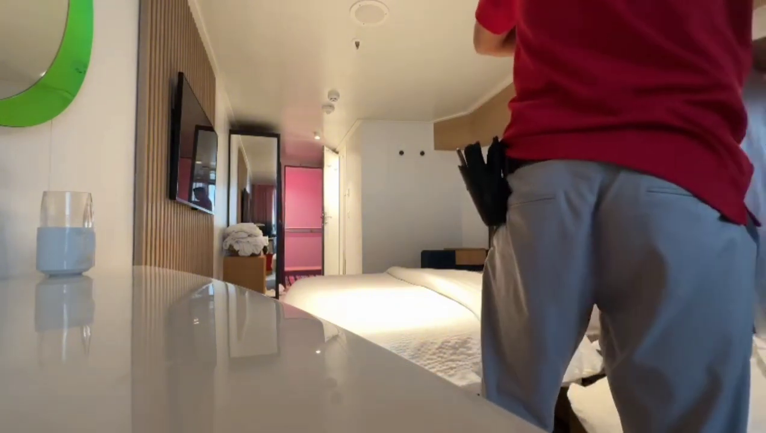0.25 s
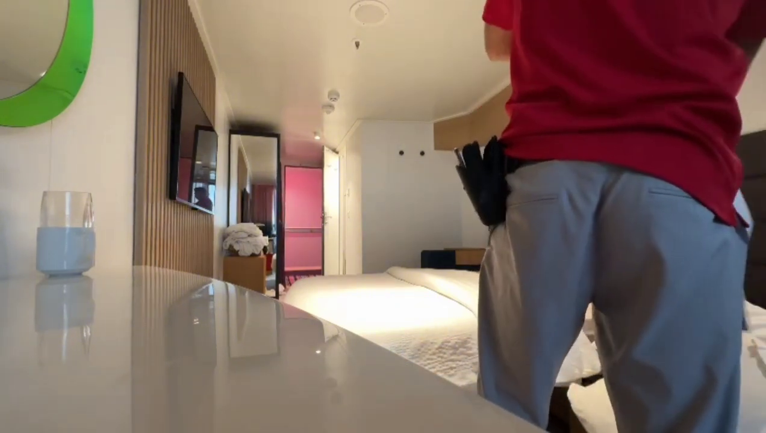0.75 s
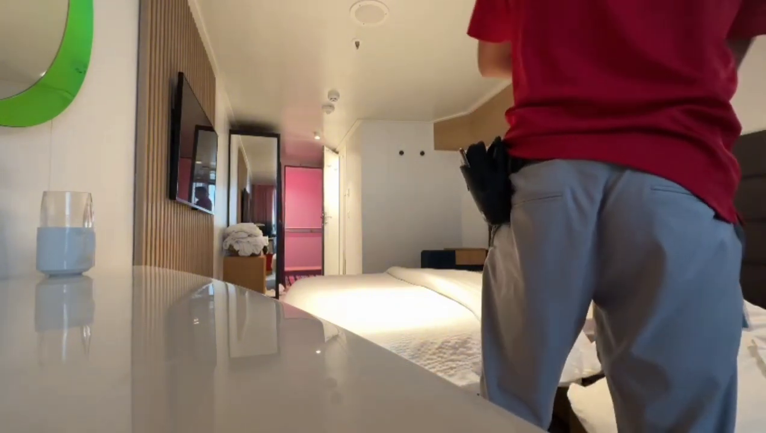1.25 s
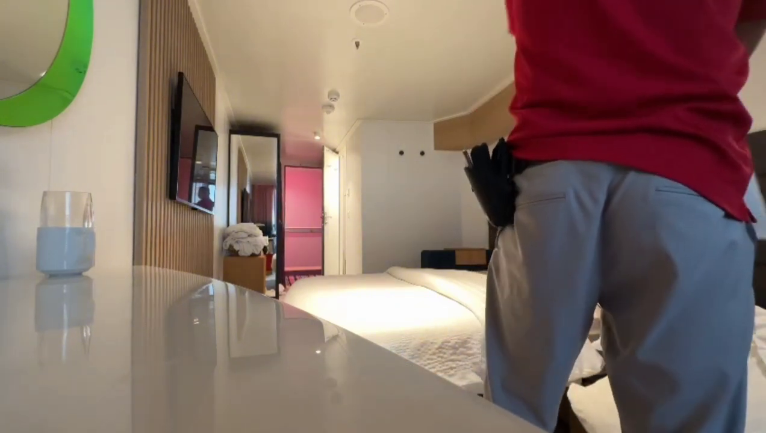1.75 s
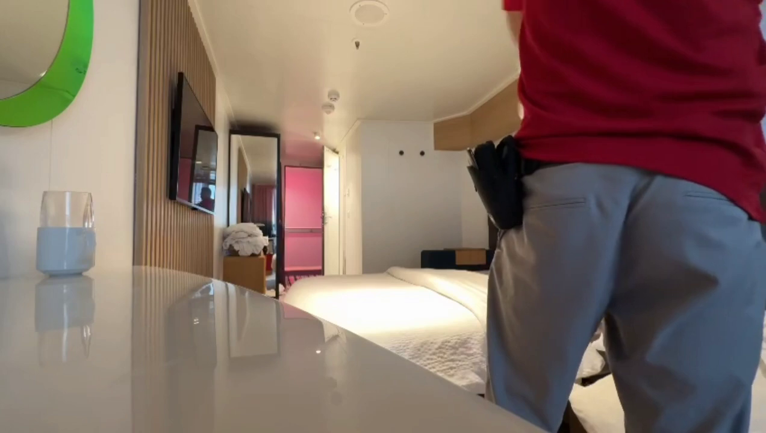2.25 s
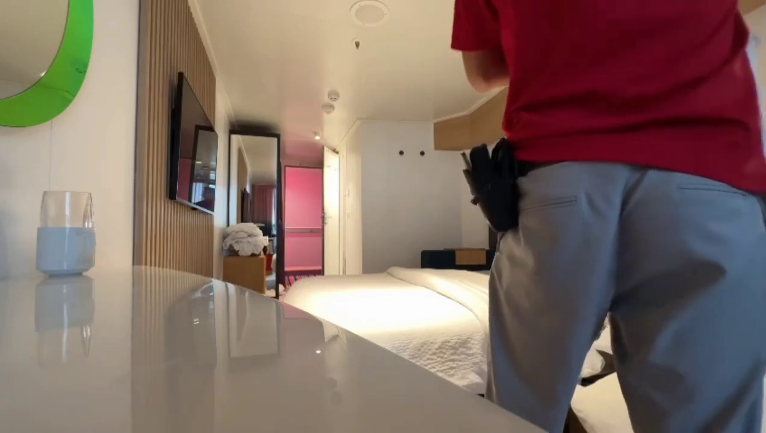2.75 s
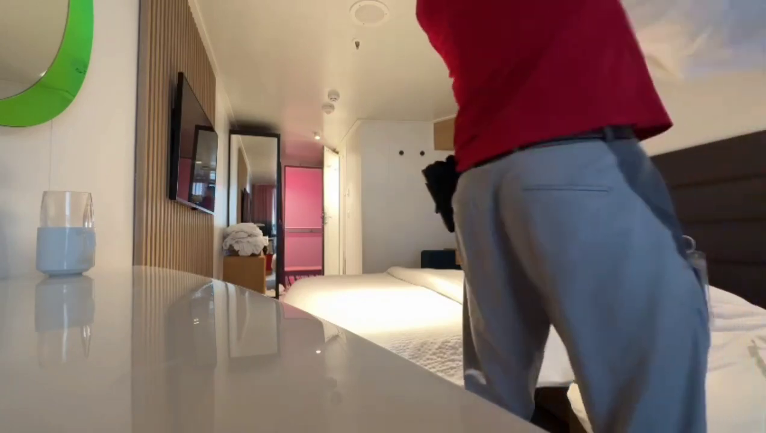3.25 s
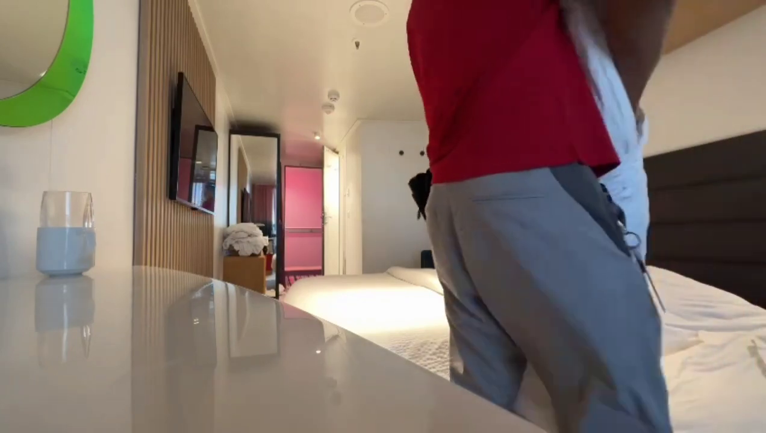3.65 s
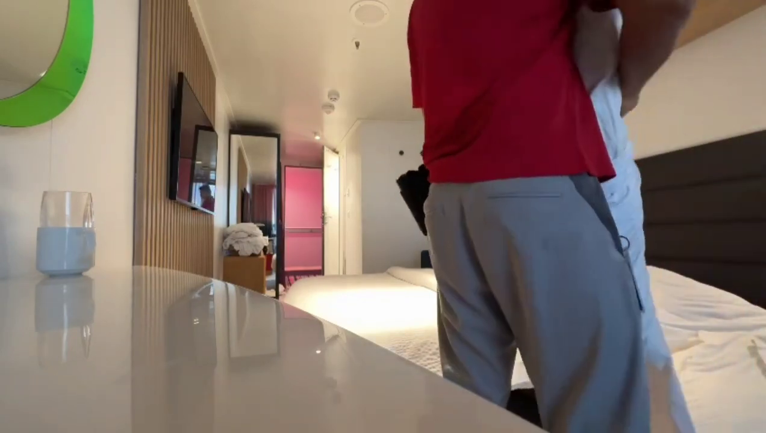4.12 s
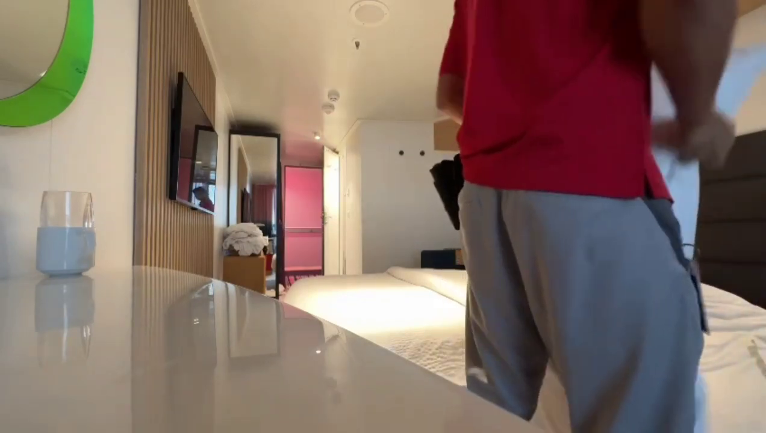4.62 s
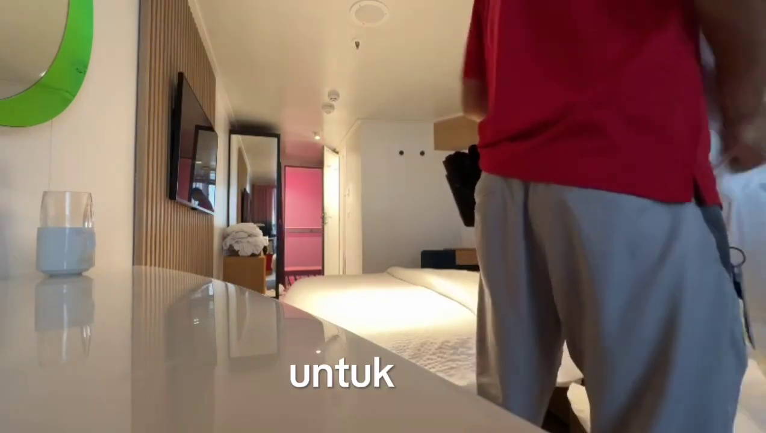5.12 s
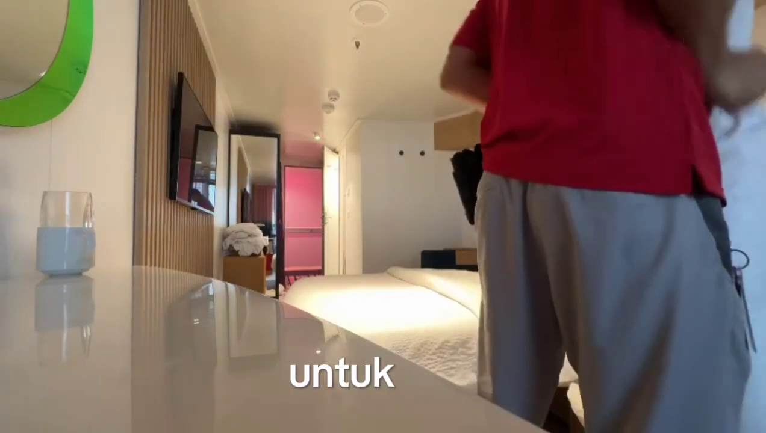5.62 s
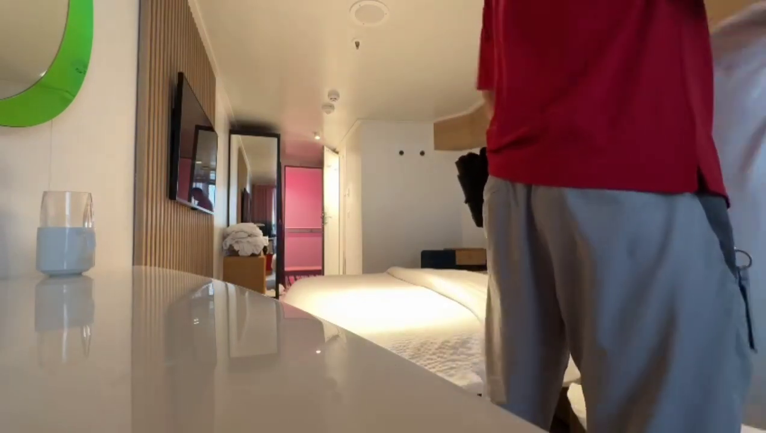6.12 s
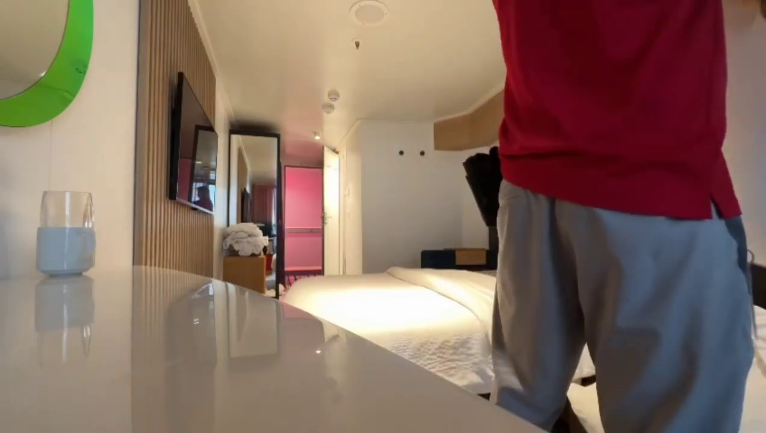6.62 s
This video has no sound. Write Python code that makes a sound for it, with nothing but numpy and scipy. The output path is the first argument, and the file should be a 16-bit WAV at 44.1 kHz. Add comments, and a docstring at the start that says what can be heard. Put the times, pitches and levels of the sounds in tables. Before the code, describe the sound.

Bed linen handled near a stereo microphone in a compact, softly furnished room with deep duct rumble. Cotton rubs and crumples in short strokes, with tiny crease ticks and muted flaps. The pillow swings with an airy low thump, quieter tugging follows, then four rapid downward shakes whip the cloth, the first loudest and ringing nearby fittings briefly. It settles into light rustle, leaning slightly left.

```python
"""Pillow into its cotton case

Close by a bed in a small cabin, a pillow is worked into its case over the rumble of the ventilation.
Dense chance slips make the hiss of cloth on cloth; sparser dull pops make crumpling folds, with single creases
ticking. Filtered bursts make snaps and flaps. The pillow is swung, then shaken down four times with puffs of air,
short swelling low tones; the hardest shake rings the fittings as decaying sines. Two microphone ports hear it."""
import sys
import numpy as np
from scipy import signal
from scipy.fft import rfft, irfft, next_fast_len
from scipy.io import wavfile
from scipy.ndimage import uniform_filter1d

SR = 44100
rng = np.random.default_rng(int(sys.argv[2]) if len(sys.argv) > 2 else 0)


def int16_out(signal):
    """Quantize to a 16-bit WAV file."""
    q = np.round(np.clip(np.atleast_2d(signal).T, -1, 1) * 32767)
    wavfile.write(sys.argv[1], SR, q.astype(np.int16))


N = 302967
SIZE = next_fast_len(N + SR // 2, True)   # room for the cabin tail
TIME = np.arange(N) / SR
HZ = np.fft.rfftfreq(SIZE, 1 / SR)

# Every level_db column is relative: gains, filters and the cabin still act on it.
# spectrum of the ventilation: hz, level_db
VENT_SPECTRUM = [(12, -43), (20, -4.5), (89, 2.5), (159, -5), (243, -16.5), (383, -18.5), (1450, -28),
                 (2150, -38.5), (5040, -45.5), (9800, -50), (11500, -43), (15000, -99), (22000, -120)]
# how alike the ventilation is at the two ports: hz, likeness (0-1)
VENT_LIKENESS = [(30, .93), (70, .8), (130, .55), (250, .2), (600, 0), (9000, .1)]
# left-right level of the ventilation: hz, left_right_db
VENT_BALANCE = [(100, 2), (150, 6.5), (240, 2.5)]
# share of the cloth sound reaching the ports directly: hz, direct_share (0-1)
DIRECT_SHARE = [(130, .6), (220, .1), (300, .45), (520, .55), (1100, .28), (2000, .25), (2700, .07),
                (11000, .13)]
# phase by which the left port leads: hz, lead_rad
LEFT_LEAD = [(160, 0), (220, -1), (380, 0), (460, -2.4), (800, -2.6), (1300, -1.8), (1800, -3), (2400, 0)]
# left-right level of the cloth along the path from the bed: hz, left_right_db
PATH_BALANCE = [(60, -1), (150, 1.5), (330, -2.5), (500, -1), (900, -1.5), (1550, 2.2), (2400, -3),
                (5000, 3), (6800, 5), (9000, -7), (11000, -3)]
# where the hands work: time_s, left_right_db
HAND_PLACE = [(2.5, 4), (3.6, 2.5), (6.0, 2.5), (6.87, 4)]
# ringing modes of the cabin's fittings: pitch_hz, level_db
FITTING_MODES = [(296, -22), (640, -34), (845, -15.5), (1331, -25), (1768, -48), (2145, -32), (2393, -26),
                 (2540, -45), (3207, -45)]
# the pillow pushes air or lands softly: middle_s, level_db, pitch_hz
PUFFS = [(1.206, -35.5, 95), (3.597, -33, 110), (3.622, -30.5, 59), (5.3, -30, 63.6), (5.544, -27, 110),
         (5.799, -33.5, 72), (6.025, -26.5, 101.5), (6.245, -33.5, 90)]
# a fold snaps taut: start_s, level_db, pitch_hz
SNAPS = [(0.074, -42, 800), (0.327, -40, 800), (0.646, -42.5, 700), (0.703, -39, 500), (0.791, -37.5, 400),
         (0.849, -41, 380), (1.026, -34, 600), (1.109, -39, 950), (1.441, -36, 290), (1.932, -43.5, 500),
         (2.147, -32, 470), (2.825, -38, 330), (3.222, -31, 700), (3.251, -37, 350), (3.597, -30, 400),
         (3.872, -35.5, 850), (4.576, -39, 600), (4.613, -37.5, 330), (4.866, -28.5, 900),
         (5.183, -30.5, 340), (5.459, -33, 650), (5.477, -26, 370), (5.52, -26, 2400), (5.531, -15, 700),
         (5.545, -22, 270), (5.789, -25.5, 290), (5.981, -28, 420), (6.007, -22, 330), (6.049, -31, 450),
         (6.244, -33, 300)]
# the case flaps as it is tugged or shaken: crest_s, level_db, length_s, billow_hz
FLAPS = [(1.014, -36.5, 0.034, 750), (1.434, -33, 0.018, 450), (2.157, -32.5, 0.021, 424),
         (2.719, -41, 0.029, 560), (3.543, -36.5, 0.03, 350), (3.595, -33.5, 0.058, 480),
         (3.677, -37, 0.029, 500), (4.963, -35.5, 0.021, 448), (5.292, -32, 0.039, 407),
         (5.497, -28.5, 0.023, 414), (5.529, -31, 0.015, 2450), (5.53, -21.5, 0.021, 680),
         (5.557, -25, 0.024, 340), (5.758, -30, 0.0224, 400), (5.79, -29.5, 0.02, 394),
         (5.992, -26.5, 0.011, 566), (6.019, -24, 0.017, 290), (6.242, -35.5, 0.059, 358)]
# spectrum of the slips in a flap: hz, level_db
FLAP_SPECTRUM = [(70, -8), (160, 8.5), (230, -2), (330, 2.5), (520, -6.5), (850, 1), (1500, -2.5),
                 (1950, -4), (2400, 0.5), (3200, -23.5), (5000, -4), (11000, -64)]
# spectrum of the crumpling pops: hz, level_db
CRUMPLE_SPECTRUM = [(70, 1), (170, -6), (350, -0.5), (600, -6.5), (1100, -6.5), (1600, -12.5), (2100, -19),
                    (4000, -23.5), (9000, -33)]
# spectrum of the sliding hiss: hz, level_db
SLIDE_SPECTRUM = [(300, -17), (900, -1), (1500, 3), (2200, -4), (3000, -6), (4500, -4.5), (7000, -6),
                  (9000, -3), (10000, -5.5), (11500, -7)]
# a hand draws cloth over cloth: fastest_s, hiss_level_db, crumple_level_db, length_s
STROKES = [(0.127, -68.5, -55.5, 0.14), (0.316, -51.5, -51.5, 0.089), (0.54, -52, -49, 0.084),
           (0.751, -45.5, -46.5, 0.078), (0.84, -64.5, -51.5, 0.2), (1.014, -45, -46, 0.092),
           (1.127, -67, -42.5, 0.089), (1.182, -51, -50, 0.11), (1.417, -48.5, -42, 0.13),
           (1.579, -58.5, -53.5, 0.13), (1.983, -57.5, -47, 0.072), (2.17, -48, -39.5, 0.03),
           (2.221, -41.5, -38.5, 0.083), (2.38, -57.5, -50.5, 0.49), (2.676, -45.5, -40, 0.075),
           (2.84, -55, -46.5, 0.079), (3.202, -55.5, -47, 0.22), (3.467, -52.5, -45.5, 0.16),
           (3.585, -51, -40.5, 0.14), (3.797, -50, -54, 0.11), (4.23, -57.5, -52.5, 0.31),
           (4.402, -52, -49.5, 0.087), (4.596, -55, -46.5, 0.11), (4.942, -53, -45, 0.26),
           (5.218, -46, -38.5, 0.084), (5.34, -58, -46, 0.35), (5.915, -53.5, -50.5, 0.059),
           (6.612, -56.5, -46, 0.099), (6.76, -53, -49.5, 0.14)]
# the pillow is shaken down: fastest_s, hiss_level_db, crumple_level_db
SHAKES = [(5.522, -44, -29.5), (5.773, -45, -34), (6.014, -42, -37), (6.243, -44.5, -41.5)]

VENT_DB = -47
BOOM_HZ, BOOM_Q, BOOM_DB = 298.5, 11, -4   # the cabin's own low resonance
CRACK_S, SLAP_S = 5.521, 5.531   # in the hardest shake the hem cracks first, then the body slaps
CRACK_ABOVE_HZ = 2000
FITTING_T60_S = 0.074
SNAP_DB, SNAP_SETTLE_S = -17.5, 0.008
FLAP_RISE_SHARE = 0.34   # part of a flap spent whipping taut
DULL_OCTAVES = 1.0   # a flap is dull from this far above its billow
STROKE_RISE_SHARE = 0.51   # part of a stroke spent speeding up
SHAKE_S, SHAKE_RISE_SHARE = 0.05, 0.6   # every shake is the same short jerk
# after a shake the cloth settles, starting with the shake and trailing after it
SETTLE_DB, SETTLE_AFTER_S, SETTLE_S, SETTLE_RISE_SHARE = -10.5, 0.021, 0.11, 0.31
EDGE = 5.5   # how steeply a movement starts and stops
HELD_POWER, HELD_HISS_DB, HELD_CRUMPLE_DB = 0.81, -66, -59.5   # faint stir of held cloth; power scales both
CUTOFF_HZ = 11700


def from_db(db):
    """Decibels to gain."""
    return 10 ** (np.asarray(db) / 20)


def rms_one(x):
    """Scale to an rms of 1."""
    return x / np.sqrt(np.mean(x ** 2) + 1e-20)


def over_hz(points):
    """Interpolate a table of (Hz, value) over log frequency."""
    hz, value = np.transpose(points)
    return np.interp(np.log(HZ + 1), np.log(hz), value)


def filtered(x, response):
    """Pass a signal through a frequency response."""
    return irfft(rfft(x, SIZE) * response, SIZE)[..., :N]


def colour(x, spectrum):
    """Give a signal a spectrum; rms 1."""
    return rms_one(filtered(x, from_db(over_hz(spectrum))))


def panned(left_right_db):
    """Left and right gains for a level difference."""
    return from_db(np.vstack([left_right_db, -left_right_db]) / 2)


def peak_filtered(x, hz, q):
    """Keep the ring of one resonance."""
    b, a = signal.iirpeak(hz, q, fs=SR)
    return signal.lfilter(b, a, x)


def drift(rate_hz):
    """Slow chance with a spread of 1."""
    return rms_one(filtered(rng.standard_normal(N), 1 / (1 + (HZ / rate_hz) ** 2)))


def fluttering(x, split_hz, depth_db, rate_hz):
    """The dull and the bright part of a sound waver in level, each on its own."""
    dull = filtered(x, 1 / (1 + (HZ / split_hz) ** 4))
    bright = x - dull
    return dull * from_db(depth_db * drift(rate_hz)) + bright * from_db(depth_db * drift(rate_hz))


def ventilation():
    """Air in the ducts, wavering a little; its deep rumble reaches both ports alike."""
    likeness = over_hz(VENT_LIKENESS)
    mid, side = colour(rng.standard_normal((2, N)), VENT_SPECTRUM)
    # the weaker the side signal, the more alike the ports
    side = filtered(side, np.sqrt((1 - likeness) / (1 + likeness)))
    ports = np.array([mid + side, mid - side])
    air = fluttering(ports, split_hz=200, depth_db=1.3, rate_hz=5)
    return from_db(VENT_DB) * filtered(air, panned(over_hz(VENT_BALANCE)))


def evened(response, bins=700):
    """The broad level of a response, without its fine ripple."""
    return np.sqrt(uniform_filter1d(np.abs(response) ** 2, bins) + 1e-12)


def cabin(patches, tail_t60_s=0.12):
    """One patch faces both ports; two come off the close walls, with a short tail that the bed soaks up."""
    tail = rng.standard_normal((2, N)) * from_db(-60 * np.minimum(TIME / tail_t60_s, 2))
    walls = 1 + rfft(tail / np.linalg.norm(tail[0]), SIZE)
    share = over_hz(DIRECT_SHARE)
    port_phase = 0.5j * over_hz(LEFT_LEAD) * [[1], [-1]]
    direct = np.sqrt(share) * np.exp(port_phase)
    echoes = np.sqrt(1 - share) * walls / evened(walls)
    # divide by what the two ports hear together, so that phase leaves the tone alone
    centre = np.sqrt(abs(direct.mean(axis=0)) ** 2 + (1 - share) / 2)
    tone = panned(over_hz(PATH_BALANCE)) / centre
    return filtered(patches[0], direct * tone) + filtered(patches[1:], echoes * tone)


def boom(linen):
    """The cabin's own low resonance, rung by the linen."""
    return from_db(BOOM_DB) * peak_filtered(linen, BOOM_HZ, BOOM_Q)


def fittings_ringing():
    """The crack rings the high modes and the slap the low ones, a quarter cycle apart at the ports."""
    out = 0
    port_phase = np.array([[0], [np.pi / 2]])
    for hz, db in FITTING_MODES:
        struck_s = CRACK_S if hz > CRACK_ABOVE_HZ else SLAP_S
        age = np.clip(TIME - struck_s, 0, 1)
        swell = 1 - np.exp(-age / 0.001)
        decay = from_db(db - 60 * age / FITTING_T60_S)
        out = out + decay * swell * np.sin(2 * np.pi * hz * age + port_phase)
    return out


def puffing():
    """A push of air that swells, swings back and dies within two cycles of its middle."""
    out = np.zeros(N)
    for s, db, hz in PUFFS:
        turns = np.clip((TIME - s) * hz, -10, 10)
        out += from_db(db) * np.sin(2 * np.pi * turns) * np.exp(-turns ** 2)
    return out


def grains(per_s, spread_db, count=3):
    """Tiny slips at random moments, of uneven size, on each patch of cloth."""
    born = rng.random((count, N)) < per_s / SR
    sign = rng.choice([-1, 1], (count, N))
    chance = rng.standard_normal((count, N))
    return born * sign * from_db(spread_db * np.clip(chance, -2, 2))


def snapping(width_octaves=1.62, crack=2.0):
    """A fold gives way with a soft crack and a dying run of slips; thick folds sound lower."""
    out = np.zeros((3, N))
    slips = grains(per_s=2500, spread_db=2.0)
    settling = np.exp(-TIME[:SR // 10] / SNAP_SETTLE_S)
    for s, db, hz in SNAPS:
        start = round(s * SR)
        span = slice(start, start + len(settling))
        run = slips[:, span] * settling
        run[:, 0] = crack
        edges_hz = hz * 2 ** (width_octaves * np.array([-.5, .5]))
        fold = signal.butter(2, edges_hz, "band", fs=SR, output="sos")
        run = signal.sosfilt(fold, signal.sosfilt(fold, run))
        out[:, span] += from_db(db + SNAP_DB) * rms_one(run)
    return out


def flapping(per_s=3000, spread_db=-0.5, gain_db=0.5, billow_db=1.5, billow_q=3.2):
    """Slack cloth whips taut: pops swell to a crest and die, and the billow rings at its own pitch."""
    out = 0
    pops = colour(grains(per_s, spread_db), FLAP_SPECTRUM)
    for s, db, length_s, billow_hz in FLAPS:
        rise_s, fall_s = FLAP_RISE_SHARE * length_s, (1 - FLAP_RISE_SHARE) * length_s
        away = np.maximum((s - TIME) / rise_s, (TIME - s) / fall_s)
        swell = np.exp(-np.clip(away, 0, 20))
        dulling = signal.butter(2, billow_hz * 2 ** DULL_OCTAVES, fs=SR, output="sos")
        flap = signal.sosfilt(dulling, pops * swell)
        billow = peak_filtered(flap, billow_hz, billow_q)
        out = out + from_db(db + gain_db) * (flap + from_db(billow_db) * billow)
    return out


def movement(s, length_s, rise_share):
    """The power of one movement of the cloth: it speeds up, crests and slows down."""
    rise_s, fall_s = rise_share * length_s, (1 - rise_share) * length_s
    away = np.maximum((s - TIME) / rise_s, (TIME - s) / fall_s)
    return (1 + away ** 2 / EDGE) ** -EDGE


def handling():
    """Powers of strokes, shakes and held cloth add up to the levels of sliding and crumpling, in dB."""
    moves = [(HELD_POWER, HELD_HISS_DB, HELD_CRUMPLE_DB)]
    for s, hiss_db, crumple_db, length_s in STROKES:
        moves.append((movement(s, length_s, STROKE_RISE_SHARE), hiss_db, crumple_db))
    for s, hiss_db, crumple_db in SHAKES:
        jerk = movement(s, SHAKE_S, SHAKE_RISE_SHARE)
        settling = from_db(SETTLE_DB) ** 2 * movement(s + SETTLE_AFTER_S, SETTLE_S, SETTLE_RISE_SHARE)
        moves.append((jerk + settling, hiss_db, crumple_db))
    total = sum(power * from_db([[hiss_db], [crumple_db]]) ** 2 for power, hiss_db, crumple_db in moves)
    return 10 * np.log10(total)


def hollow(x, hz, q, block=256):
    """A resonance whose pitch moves block by block, as in a changing pocket of cloth."""
    out, state = np.zeros_like(x), np.zeros((len(x), 2))
    for i in range(0, N, block):
        w = 2 * np.pi * hz[i] / SR
        r = np.exp(-w / (2 * q))
        b = [(1 - r * r) / 2, 0, (r * r - 1) / 2]
        a = [1, -2 * r * np.cos(w), r * r]
        out[:, i:i + block], state = signal.lfilter(b, a, x[:, i:i + block], zi=state)
    return out


def creasing(level_db, gain_db=-11.5, low_hz=380, high_hz=1500, q=5.0, count=8):
    """Now and then a single crease flips over, ticking at one of a few pitches."""
    ticks = 0
    for hz in np.geomspace(low_hz, high_hz, count):
        flips = grains(per_s=4, spread_db=2.5) + 1e-18
        ticks = ticks + peak_filtered(flips, hz, q) / hz   # higher creases tick more softly
    return from_db(level_db + gain_db) * rms_one(ticks)


def crumpling(level_db, per_s=650, spread_db=2.5, gain_db=-2.5, pocket_hz=450, wander_octaves=0.39):
    """Soft folds buckle in clumps of dull little pops, in a pocket of cloth that keeps changing size."""
    pops = colour(grains(per_s, spread_db), CRUMPLE_SPECTRUM)
    moving_hz = pocket_hz * 2 ** (wander_octaves * drift(rate_hz=4.0))
    pops = pops + hollow(pops, moving_hz, q=4.5)
    # large and small folds move apart
    return from_db(level_db + gain_db) * fluttering(pops, split_hz=640, depth_db=4.0, rate_hz=17.2)


def sliding(level_db, per_s=9000, spread_db=-1.0, weave_hz=4800, weave_db=-5.5):
    """Threads catch so densely that they fuse into a hiss; it keeps snagging, and its colour shifts."""
    hiss = colour(grains(per_s, spread_db), SLIDE_SPECTRUM)
    moving_hz = weave_hz * 2 ** (0.3 * np.clip(drift(rate_hz=6), -2, 2))
    hiss = rms_one(hiss + from_db(weave_db) * hollow(hiss, moving_hz, q=2.5))
    snags = from_db(1.1 * drift(rate_hz=45))
    return from_db(level_db) * snags * fluttering(hiss, split_hz=3070, depth_db=1.6, rate_hz=10)


def scene(linen_db=-1.0):
    """Linen and pillow sound in the cabin, over the ventilation."""
    slide_db, crumple_db = handling()
    place_s, place_db = np.transpose(HAND_PLACE)
    hands_db = np.interp(TIME, place_s, place_db)
    linen = sliding(slide_db) + crumpling(crumple_db) + creasing(crumple_db)
    linen = linen + flapping() + snapping() + puffing()
    at_ports = from_db(linen_db) * cabin(linen + boom(linen)) * panned(hands_db)
    return at_ports + fittings_ringing() + ventilation()


def record(dry):
    """The microphone signal is cut steeply above the cutoff."""
    return signal.sosfilt(signal.ellip(12, .1, 80, CUTOFF_HZ, fs=SR, output="sos"), dry)


dry = scene()
out = record(dry)
int16_out(out)
```